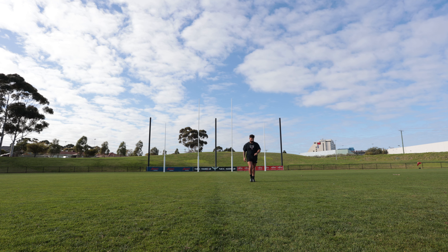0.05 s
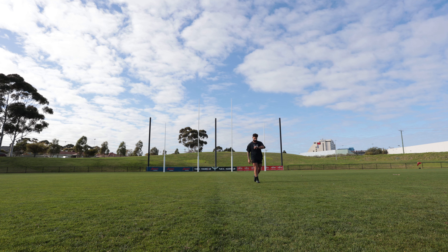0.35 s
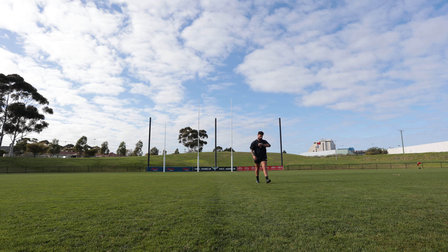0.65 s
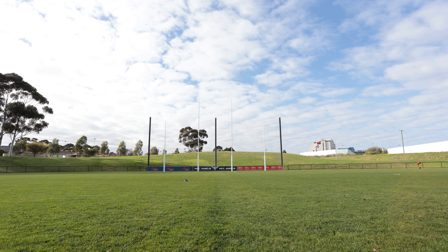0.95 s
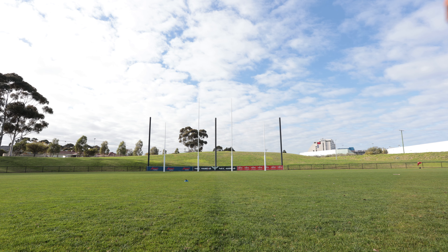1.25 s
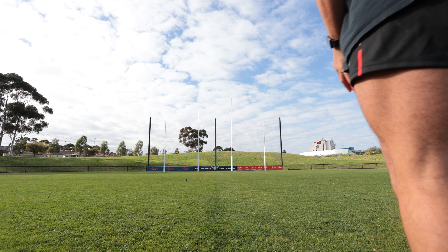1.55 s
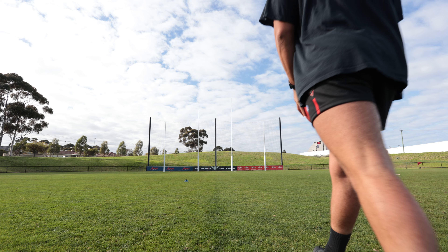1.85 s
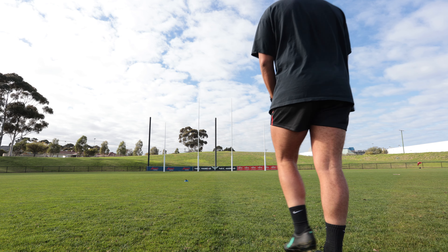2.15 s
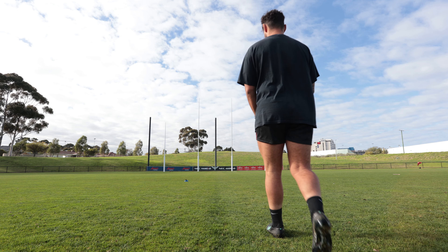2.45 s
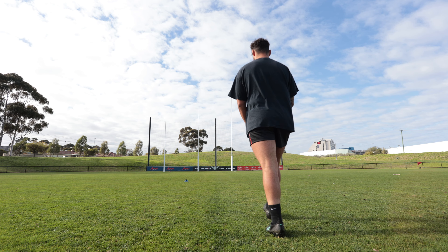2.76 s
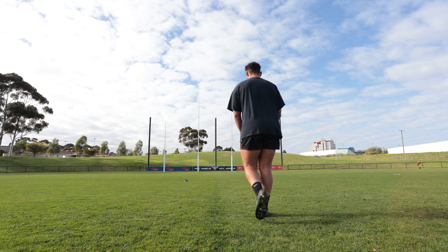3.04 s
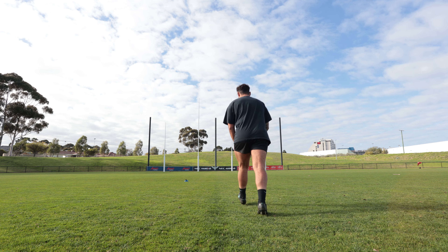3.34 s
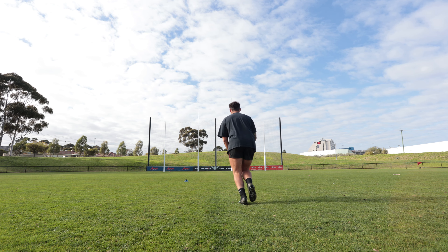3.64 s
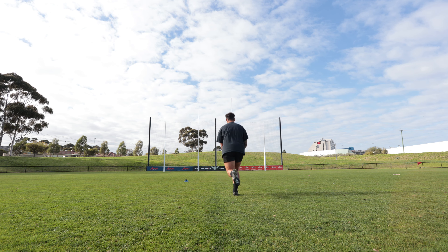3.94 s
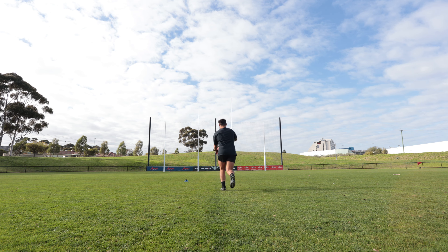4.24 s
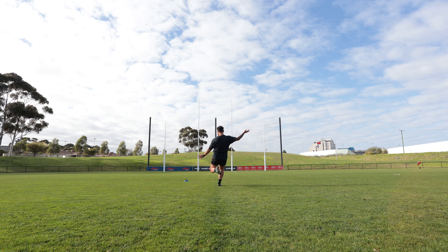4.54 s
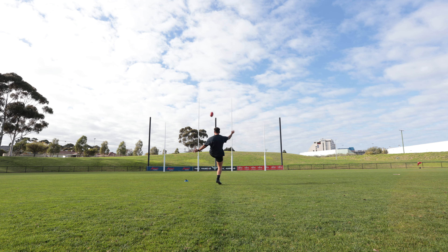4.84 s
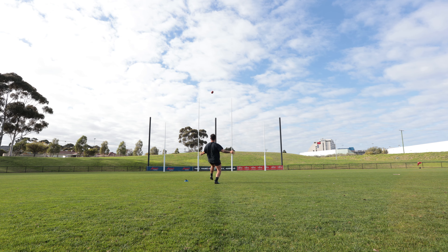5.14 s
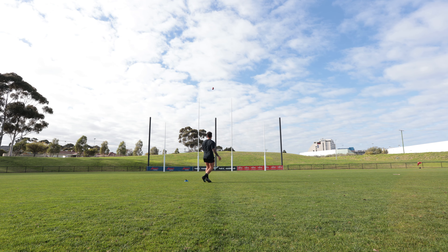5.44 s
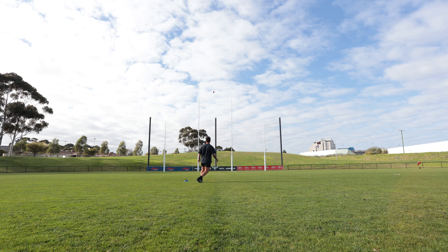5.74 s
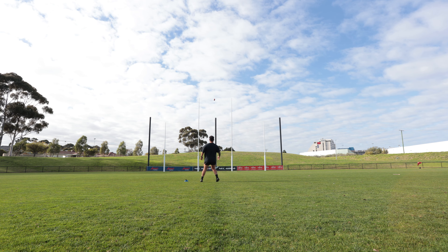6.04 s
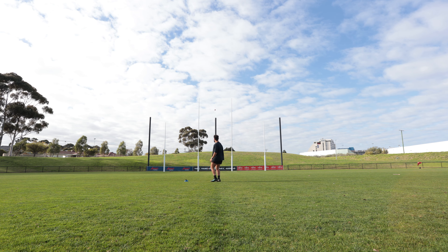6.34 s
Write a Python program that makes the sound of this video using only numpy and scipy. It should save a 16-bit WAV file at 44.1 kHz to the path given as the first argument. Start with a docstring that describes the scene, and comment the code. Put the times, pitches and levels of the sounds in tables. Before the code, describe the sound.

A faint, low rumble of distant town traffic and a light hiss run throughout on an open grass oval. Small birds whistle, chirp and twitter quietly, busiest from about 0.5 to 1.4 seconds and again around 3 seconds. A far engine hums, swelling gently near 4 seconds and fading away. From about 4 seconds a player's boots crunch softly on the turf, with a couple of dull thuds in the last stride. At about 4.7 seconds the boot punts a football: one very loud, deep thump with a sharp leathery slap, then a short ping from the air inside the ball and faint echoes around the field. From 5 seconds the player lands and takes several more soft steps, thudding, crunching and swishing through the grass. These thin out by about 6.4 seconds, with a little more distant twittering.

```python
"""A football punt on the grass

A player jogs away over an open oval, boots crunching and thudding on the turf, and punts a ball.
The ball's skin slaps, there is a deep thump, and the air inside rings with a short ping.
Faint echoes and more steps follow. Small birds whistle and twitter over the low rumble of a
distant town, where an engine hums past."""
import sys
import numpy as np
from scipy import signal
from scipy.fft import rfft, irfft, next_fast_len
from scipy.io import wavfile

SR = 44100
rng = np.random.default_rng(int(sys.argv[2]) if len(sys.argv) > 2 else 0)


def pcm_store(signal):
    """Save signal as 16-bit PCM."""
    levels = np.round(np.clip(np.atleast_2d(signal), -1, 1) * 32767)
    wavfile.write(sys.argv[1], SR, levels.astype(np.int16).T)


N = 286297
TIME = np.arange(N) / SR
KICK_S, CONTACT_S = 4.726066, 0.01034  # when the boot meets the ball, and how long they touch


def from_db(db):
    """Turns decibels into a gain: 0 dB changes nothing, -6 dB is about half."""
    return 10 ** (np.asarray(db) / 20)


def unit_level(x):
    """Scales a signal so that its average strength (rms) is 1."""
    return x / np.sqrt(np.mean(x ** 2) + 1e-20)


def since(moment):
    """Seconds since a moment, zero before it."""
    return np.maximum(TIME - moment, 0)


def drift(rate):
    """A smooth random wander, about 1 in size; a higher rate wanders faster."""
    pole = np.exp(-80 * np.pi * rate / SR)
    jitter = rng.standard_normal(N // 40 + 2002)
    slow = signal.lfilter([1], [1, -2 * pole, pole * pole], jitter)[2000:]
    return np.interp(np.arange(N) / 40, np.arange(len(slow)), unit_level(slow))


def coloured(x, spectrum):
    """Makes some frequencies stronger than others, then sets the strength to 1."""
    hz, db = np.transpose(spectrum)
    size = next_fast_len(N)
    bin_hz = np.maximum(np.arange(size // 2 + 1) * SR / size, 1)
    gains = from_db(np.interp(np.log(bin_hz), np.log(hz), db))
    return unit_level(irfft(rfft(x, size) * gains, size)[:N])


def noise(spectrum):
    """Steady noise with the given tone colour."""
    return coloured(rng.standard_normal(N), spectrum)


def dull(x, hz, order):
    """Softens everything above a frequency."""
    return signal.sosfilt(signal.butter(order, hz, fs=SR, output="sos"), x)


def grains(per_s, spread_db):
    """Random snaps of uneven size."""
    sizes = from_db(spread_db * np.minimum(rng.exponential(1, N), 4))
    return sizes * rng.choice([-1, 1], N) * (rng.random(N) < per_s / SR)


def swells(times, levels_db, rises):
    """A loudness curve of swells, each peaking after its rise time and dying away."""
    out = np.zeros(N)
    for start, db, rise in zip(times, levels_db, rises):
        first = int(start * SR)
        age = TIME[:min(N - first, SR // 2)] / rise
        out[first:first + len(age)] += from_db(db) * age * np.exp(1 - age)
    return out


def ring(t, tones):
    """Pure tones that each fade by 60 dB over their ring time."""
    return sum(from_db(db - 60 * t / ring_s) * np.sin(2 * np.pi * hz * t) for hz, db, ring_s in tones)


# The tone colours of the town and the hiss. Each row: frequency in Hz, relative level in dB.
TOWN_COLOUR = [(15, -58.5), (25, -29.5), (43, -15), (64, -14.5), (87, -1), (185, 1), (213, -2), (245, -0.5),
               (359, -5), (397, -4), (536, -9.5), (642, -8.5), (1520, -21.5), (1820, -24.5), (3000, -32),
               (3900, -59), (6600, -120)]
HISS_COLOUR = [(1500, -18), (2800, -1), (4500, 2), (7000, -0.5), (10000, -2), (12600, -2), (13400, -8),
               (16000, -13.5)]
def town(rumble_db=-53.5, sway_db=-0.52, hiss_db=-66):
    """Far traffic rumbles under an even hiss."""
    rumble = from_db(rumble_db + sway_db * drift(11.4)) * noise(TOWN_COLOUR)
    return rumble + from_db(hiss_db) * noise(HISS_COLOUR)


# The engine's hum. Each row: pitch in Hz, relative level in dB.
ENGINE_TONES = [(96.9, -62), (193.8, -57)]
def engine(level_db=-2, nearest_s=4.06, linger_s=0.67, wander=0.0122):
    """A far engine hums, swelling and fading as it goes by."""
    clock = np.cumsum(1 + wander * drift(2.1)) / SR  # uneven time makes the pitch wander
    hum = sum(from_db(db) * np.sqrt(2) * np.sin(2 * np.pi * hz * clock) for hz, db in ENGINE_TONES)
    distance = np.hypot(1, (TIME - nearest_s) / linger_s)
    return from_db(level_db + 2 * drift(3.95)) * hum / distance


# Far-off tones. Each row: start in seconds, pitch in Hz, level in dB, rise time in seconds.
FAINT_TONES = [(.62, 460.6, -57.5, 0.052), (1.91, 610, -61.5, 0.046), (2.5, 640, -63, 0.069)]
def far_tones(waver=0.0247):
    """A few soft wavering tones barely rise out of the rumble."""
    clock = np.cumsum(1 + waver * drift(15)) / SR
    return sum(swells([start], [db], [rise]) * np.sin(2 * np.pi * hz * clock)
               for start, hz, db, rise in FAINT_TONES)


# Bird chatter. Each row: middle and half length in seconds, pitch in Hz, relative level in dB.
TWITTER_BURSTS = [(0.099, 0.053, 4230, -66.5), (.578, .038, 4300, -67), (.58, .03, 7540, -72),
                  (1.215, 0.045, 4480, -65), (1.255, 0.033, 6960, -73), (1.25, .025, 10400, -70),
                  (2.52, 0.08, 4430, -66.5), (2.76, .04, 4300, -68), (2.82, 0.031, 5230, -70),
                  (4.21, .11, 4440, -67), (5.45, 0.089, 4400, -69.5), (6.12, 0.11, 4940, -64)]
def twitter(leap=0.13, flutter_db=4, count=5):
    """A few birds chatter at once, each leaping quickly in pitch and strength."""
    out = np.zeros(N)
    for _ in range(count):
        pitch = np.exp(leap * drift(70.3))
        strength = unit_level(from_db(flutter_db * drift(42)))
        for middle, half, hz, db in TWITTER_BURSTS:
            part = np.abs(TIME - middle) < 2 * half
            offset = (TIME[part] - middle) / half
            burst = from_db(db) * np.exp(-offset ** 2 / 2 - (offset / 1.5) ** 4)
            out[part] += burst * strength[part] * np.sin(2 * np.pi * np.cumsum(hz * pitch[part]) / SR)
    return out * np.sqrt(2 / count)


def bend(values, progress):
    """A smooth curve through evenly spaced values, as progress goes from 0 to 1."""
    curve = np.polyfit(np.linspace(0, 1, len(values)), values, len(values) - 1)
    return np.polyval(curve, progress)


def bird_note(start, length, hz, db, waver=0.0078, edge_s=0.0024):
    """A slightly trembling note that bends through the given pitches and levels."""
    out, part = np.zeros(N), slice(int(start * SR), int((start + length) * SR))
    t = TIME[part] - start
    edges = np.clip(np.minimum(t, length - t) / edge_s, 0, 1)
    pitch = bend(hz, t / length) * (1 + waver * drift(150)[part])
    level = edges * from_db(bend(db, t / length))
    out[part] = level * np.sqrt(2) * np.sin(2 * np.pi * np.cumsum(pitch) / SR)
    return out


# Quick chirps. Each row: start and length in seconds, first and last pitch in Hz, relative level in dB.
CHIRP_NOTES = [(0.554, .009, 3800, 4200, -62), (.581, .007, 5150, 4650, -64),
               (0.587, .024, 4000, 3620, -62), (0.647, .012, 4860, 3370, -60.5),
               (1.189, .008, 3700, 4300, -62), (1.194, .008, 5200, 5150, -51),
               (1.202, .007, 3720, 5240, -53), (1.206, .015, 3870, 4230, -60),
               (1.229, .008, 6200, 8400, -60), (1.275, .012, 4720, 4300, -54),
               (1.278, .006, 3500, 4300, -59), (3.058, 0.014, 3250, 3820, -65),
               (3.117, .011, 3920, 4500, -61)]
# Squeaks. Each row: start and length in seconds, first, middle and last base pitch in Hz,
# relative level in dB.
SQUEAK_NOTES = [(1.147, .028, 1630, 1660, 1880, -61), (1.173, 0.026, 1760, 1600, 1540, -60),
                (1.21, 0.02, 1800, 1780, 1700, -61), (1.268, 0.014, 1760, 1700, 1790, -63)]
# A squeak's overtones. Each row: multiple of the base pitch, relative level in dB.
SQUEAK_OVERTONES = [(2, -5), (3, 0), (4, 0.5)]
def chirps(chirp_db=-2, squeak_db=-4, scratch=0.012):
    """Birds make short scratchy sweeps, and nasal squeaks built only of overtones."""
    sweeps = sum(bird_note(start, length, [first_hz, last_hz], [db], scratch)
                 for start, length, first_hz, last_hz, db in CHIRP_NOTES)
    squeaks = sum(bird_note(start, length, multiple * np.array(hz), [db + tone_db], scratch)
                  for start, length, *hz, db in SQUEAK_NOTES for multiple, tone_db in SQUEAK_OVERTONES)
    return from_db(chirp_db) * sweeps + from_db(squeak_db) * squeaks


# Two-note calls. Each row: time of the jump in seconds; the low note's pitch in Hz, length in seconds,
# slide in octaves and relative level in dB; the pause in seconds; the high note's pitch in Hz,
# length in seconds, arch and fall in octaves and relative level in dB.
BIRD_CALLS = [(0.306, 4100, .021, -.019, -74, .002, 5100, 0.067, .02, 0.038, -65.5),
              (0.621, 4350, 0.031, -0.18, -55.5, .002, 5300, .031, .02, .03, -66),
              (1.055, 4500, .026, 0.013, -51, 0.00096, 5570, .011, -0.026, .02, -55.5),
              (1.24, 3900, 0.0066, .25, -54, .001, 5250, 0.0293, 0.079, 0.091, -50),
              (1.286, 4570, 0.05, 0.092, -49.5, 0.0102, 5680, 0.043, .06, .02, -60),
              (2.775, 4170, 0.029, 0.091, -70, .002, 5290, .078, .02, .03, -68),
              (3.126, 3940, 0.05, 0.11, -63, 0.0084, 5540, .016, -.05, .02, -54)]
def whistles(level_db=-1.5, flutter_db=1.5, swell_db=2, grow_db=1):
    """A bird slides along a low note, breaks, and jumps to a high one that curves and falls."""
    out, ends, ramp = np.zeros(N), np.array([1, 0, 1]), np.array([-0.5, 0, 0.5])
    for jump, low_hz, low_s, slide, low_db, pause, high_hz, high_s, arch, fall, high_db in BIRD_CALLS:
        low_pitches = low_hz * 2 ** (slide * ramp)
        high_pitches = high_hz * 2 ** (-arch * ends - fall * ramp)
        out += bird_note(jump - pause - low_s, low_s, low_pitches, low_db - swell_db * ends)
        out += bird_note(jump, high_s, high_pitches, high_db + grow_db * ramp)
    return from_db(level_db + flutter_db * drift(50)) * out


def trees(x, ring_s):
    """Trunks and leaves scatter a sound into a soft tail."""
    tail = rng.standard_normal(SR) * from_db(-60 * TIME[:SR] / ring_s)
    return signal.fftconvolve(x, tail / np.sqrt(np.sum(tail ** 2)))[:N]


def birds(near_tail_db=-12, far_db=-3, far_tail_db=-6):
    """The whistlers are close and ring on around the field; the chatter is deeper in the trees."""
    near, far = whistles() + chirps(), twitter()
    near_tail = from_db(near_tail_db) * trees(near, ring_s=0.99)
    far_tail = from_db(far_tail_db) * trees(far, ring_s=0.18)
    return near + near_tail + from_db(far_db) * far + far_tail


# The player's weight coming down. Each row: start in seconds, relative level in dB.
FOOTFALLS = [(4.537, -41.5), (4.621, -42), (4.975, -34.5), (5.114, -45), (5.283, -35), (5.317, -44),
             (5.671, -39), (5.783, -43)]
# The ground's thud. Each row: pitch in Hz, relative level in dB, ring time in seconds.
GROUND_TONES = [(149.8, -3.5, 0.094), (212, 1.5, 0.051), (359, -9, 0.051), (550, -1, 0.02)]
def landings(level_db=2, give_s=0.002):
    """The turf gives under each landing, so the thud starts softly."""
    blows, t = np.zeros(N), TIME[:SR // 8]
    for start, db in FOOTFALLS:
        blows[int(start * SR)] = from_db(db + level_db)
    thud = ring(t, GROUND_TONES) * (1 - np.exp(-t / give_s))
    return signal.fftconvolve(blows, thud)[:N]


# Boot crunches and swishes, plus a faint swish at 5.38 s, probably the kick's distant echo.
# Each row: start and rise time in seconds, relative levels of the crunch and the swish in dB.
CRUNCHES_AND_SWISHES = [(3.982, 0.004, -58, -76), (4.316, 0.0035, -51, -78), (4.523, 0.012, -59.5, -74),
                        (4.599, 0.0054, -48, -61), (4.612, 0.0048, -43.5, -72), (4.641, 0.0015, -56, -59),
                        (4.707, 0.0021, -42.5, -58), (5.033, 0.012, -51.5, -67), (5.052, 0.0046, -41, -60),
                        (5.102, 0.0016, -48, -63), (5.279, 0.0038, -51, -54.5), (5.292, 0.0015, -41.5, -74),
                        (5.302, 0.003, -53, -56), (5.317, 0.0044, -53, -59), (5.38, 0.013, -85, -61),
                        (5.535, 0.011, -61, -70), (5.618, 0.014, -58, -66), (5.634, 0.0018, -51, -61),
                        (5.668, 0.0027, -56, -56), (5.692, 0.0032, -57, -61), (5.723, 0.0025, -61, -63),
                        (5.773, 0.022, -54, -55), (5.794, 0.00041, -55, -58), (5.8, 0.0015, -65, -63),
                        (5.83, 0.0018, -62, -55), (5.838, 0.0011, -53, -80), (5.852, 0.0012, -69, -64),
                        (5.893, 0.0026, -52, -70), (6.069, 0.0012, -58, -53), (6.13, 0.055, -69, -62.5),
                        (6.37, 0.034, -64.5, -64)]
# The tone colours of turf and grass blades. Each row: frequency in Hz, relative level in dB.
CRUNCH_COLOUR = [(200, -3.5), (600, 2.5), (1100, -1.5), (1600, 3.5), (2200, -0.5), (3000, -20), (5000, -25),
                 (12000, -40)]
SWISH_COLOUR = [(1500, -22), (2500, 8.5), (3300, 1), (6000, -7.5), (10000, -10), (16000, -22.5)]
def footsteps(swish_db=-3, rustle_db=-16.5, rustle_s=0.035):
    """Studs tear the turf in dense snaps, the blades swish, and the grass rustles as it springs back."""
    starts, rises, crunch, swish = np.transpose(CRUNCHES_AND_SWISHES)
    turf = coloured(grains(per_s=4500, spread_db=3), CRUNCH_COLOUR)
    blades = coloured(grains(per_s=6000, spread_db=3), SWISH_COLOUR)
    tearing = swells(starts, crunch, rises)
    rustling = swells(starts, swish + rustle_db, np.full(len(starts), rustle_s))
    return turf * (tearing + rustling) + blades * swells(starts, swish + swish_db, rises)


# Echoes from around the field. Each row: delay in seconds, level in dB, rise time in seconds.
KICK_ECHOES = [(0.011, -44.5, 0.00525), (.03, -61, 0.038), (.064, -65, 0.0077), (.134, -61.5, 0.01),
               (.203, -66.5, 0.011)]
# Their tone colour. Each row: frequency in Hz, relative level in dB.
ECHO_COLOUR = [(1000, -3), (2200, -5), (3800, 0), (5300, -0.5), (7500, -10), (14000, -27)]
def echoes():
    """The slap comes back faint and smeared into puffs of noise."""
    delays, levels_db, rises = np.transpose(KICK_ECHOES)
    return noise(ECHO_COLOUR) * swells(KICK_S + delays, levels_db, rises)


# The air in the ball, lowest tone first. Each row: pitch in Hz, relative level in dB,
# ring time in seconds.
BALL_AIR_TONES = [(841, -26.5, 0.45), (2600, -57, 0.32), (3490, -56, 0.26), (4860, -56.5, .25),
                  (5050, -57.5, .3)]
def ping(tumble_hz=3, leave_s=0.078, sharp_share=0.057, settle_s=0.054, sideways_db=3):
    """The air inside rings, sending its lowest tone along the tumbling ball and the others sideways."""
    t = since(KICK_S)
    angle = 2 * np.pi * tumble_hz * t
    lengthways = np.cos(angle) * np.exp(-(t / leave_s) ** 4) * ring(t, BALL_AIR_TONES[:1])
    # The upper tones start a little high and settle.
    clock = t + sharp_share * settle_s * (1 - np.exp(-t / settle_s))
    sideways = np.sin(angle) * ring(clock, BALL_AIR_TONES[1:])
    return lengthways + from_db(sideways_db) * sideways


# The ball's skin and the boot's hard top. Each row: pitch in Hz, relative level in dB,
# ring time in seconds.
SKIN_TONES = [(262, -13.6, .046), (379, -20.3, .049), (547, -16.9, .043), (716, -24.3, .046),
              (819, 0, .0131), (1065, 2, .0083), (1431, -7.2, .0167), (1649, 3.5, .0062),
              (1964, 5.6, .0053)]
BOOT_TONES = [(4420, -17, .0039), (5840, -8.7, .0027), (7410, -11.6, .0021), (10500, -20.7, .0013)]
# The tone colour of rubbing leather. Each row: frequency in Hz, relative level in dB.
LEATHER_COLOUR = [(1500, -14.5), (2400, 1), (3000, -1.5), (4200, 1), (7500, -4.5), (10000, -11.5),
                  (12500, -18.5), (16000, -21.5)]
def slap(slip_db=-24, slip_s=0.00046, creak_db=-31, creak_s=0.0032, release_db=-9.2):
    """The skin rings when hit and, softer, as it springs back; the boot snaps, slips and creaks on it."""
    release = from_db(release_db) * dull(ring(since(KICK_S + CONTACT_S), SKIN_TONES), hz=430, order=1)
    skin = dull(ring(since(KICK_S), SKIN_TONES) + release, hz=2800, order=2)
    snap = ring(since(KICK_S + 0.0004), BOOT_TONES)
    rubbing = swells([KICK_S + 0.0012, KICK_S], [slip_db, creak_db], [slip_s, creak_s])
    return snap + noise(LEATHER_COLOUR) * rubbing - skin


def thump(level_db=-2.4, settled_hz=130.6, extra_hz=674, glide_s=0.001085, rise_s=0.0006, ring_s=0.0217):
    """A deep thump that drops quickly in pitch and dies as the ball leaves the boot."""
    t = since(KICK_S)
    turns = settled_hz * t + extra_hz * glide_s * (1 - np.exp(-t / glide_s))
    push = (1 - np.exp(-t / rise_s)) * from_db(-60 * since(KICK_S + CONTACT_S) / ring_s)
    return -from_db(level_db) * push * np.sin(2 * np.pi * turns)


def scene():
    """The kick, the player's steps and the surroundings, in one channel."""
    kick = thump() + slap() + ping() + echoes()
    surroundings = birds() + engine() + far_tones() + town()
    return (kick + footsteps() + landings() + surroundings)[None]


def record(dry):
    """The kick is just loud enough to clip, and the highest treble is cut."""
    cutoff_hz = 15700
    treble_cut = signal.ellip(10, 0.1, 70, cutoff_hz, fs=SR, output="sos")
    return signal.sosfilt(treble_cut, np.clip(dry, -1, 1))


dry = scene()
out = record(dry)
pcm_store(out)
```